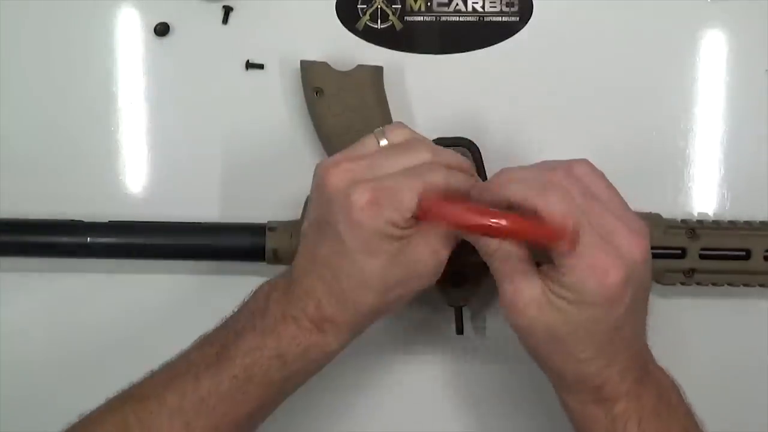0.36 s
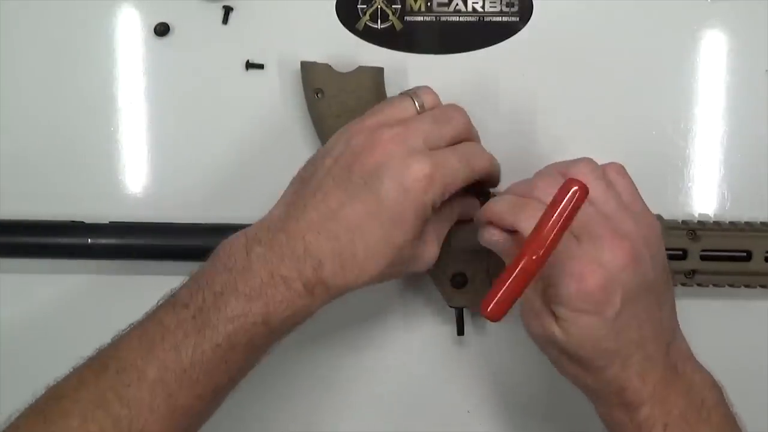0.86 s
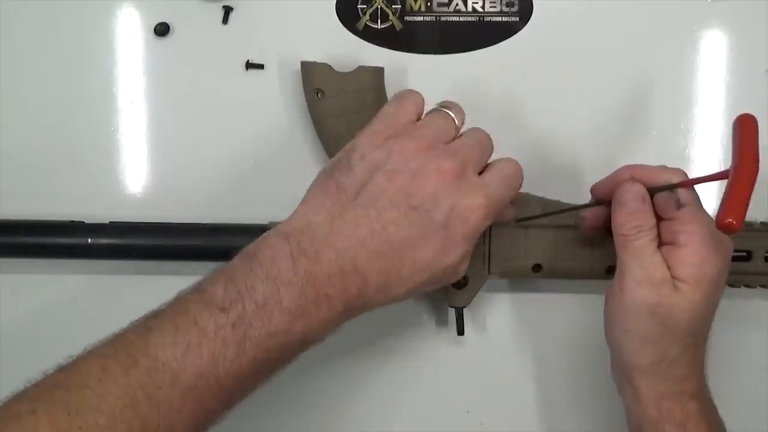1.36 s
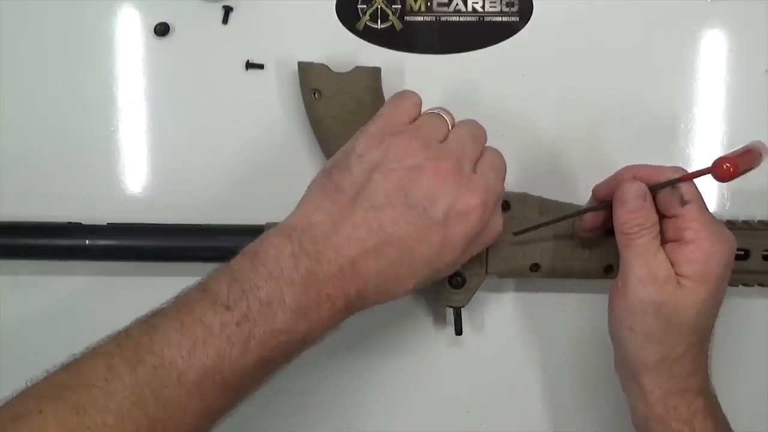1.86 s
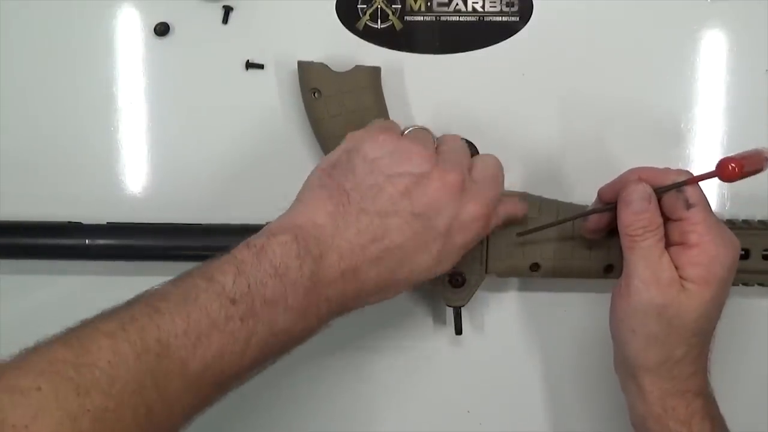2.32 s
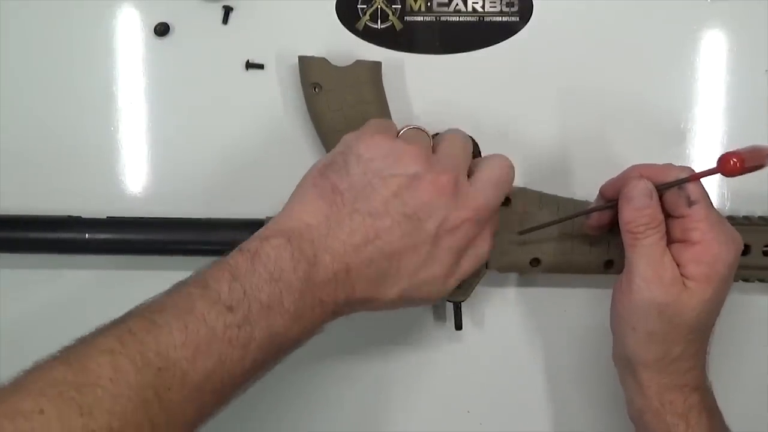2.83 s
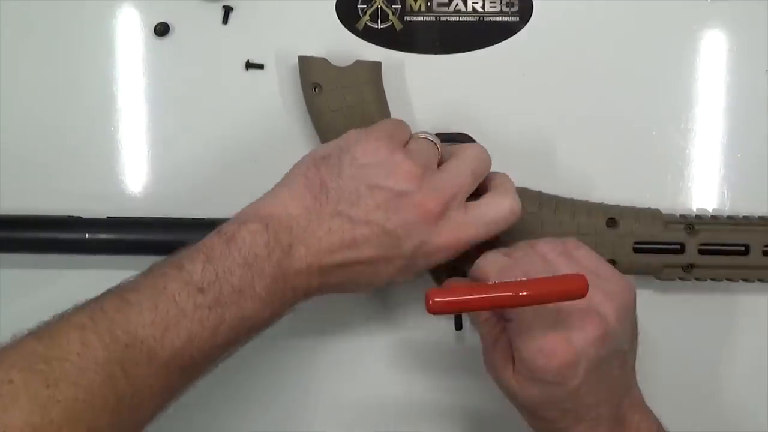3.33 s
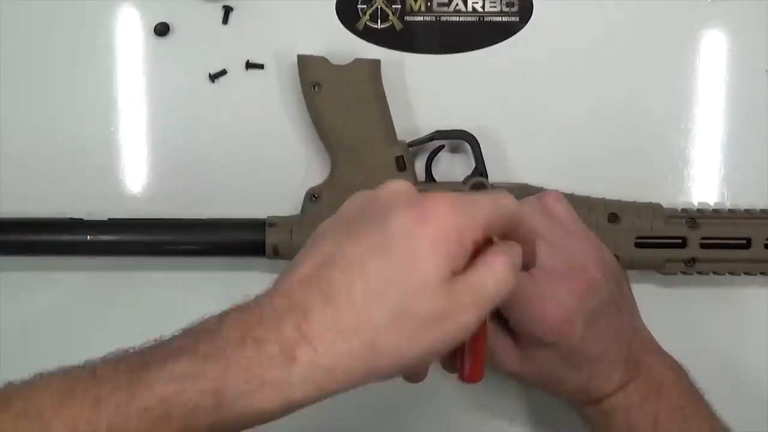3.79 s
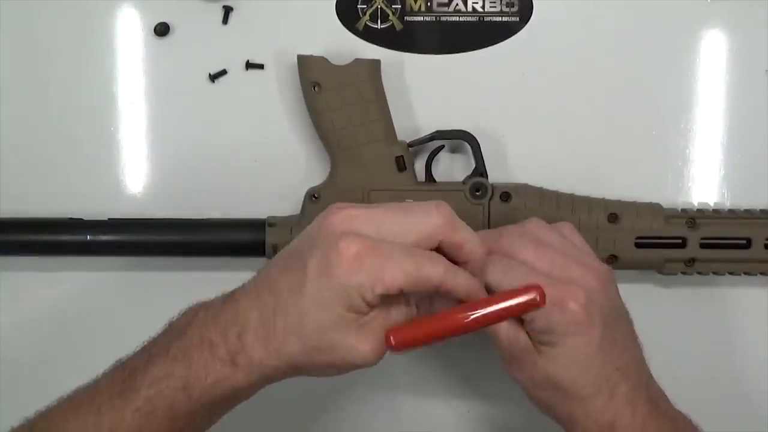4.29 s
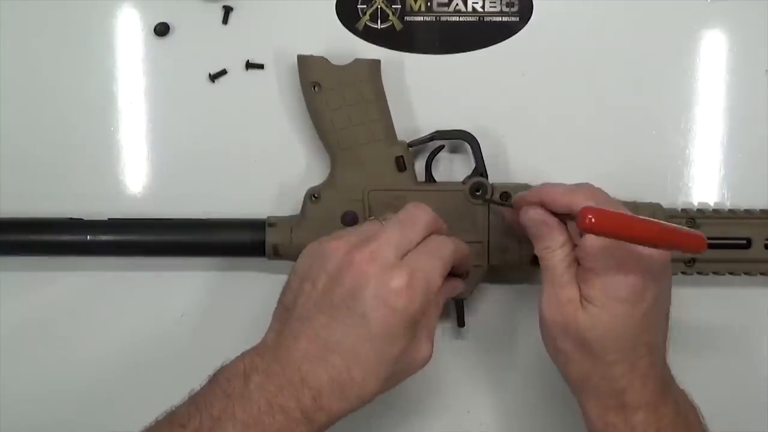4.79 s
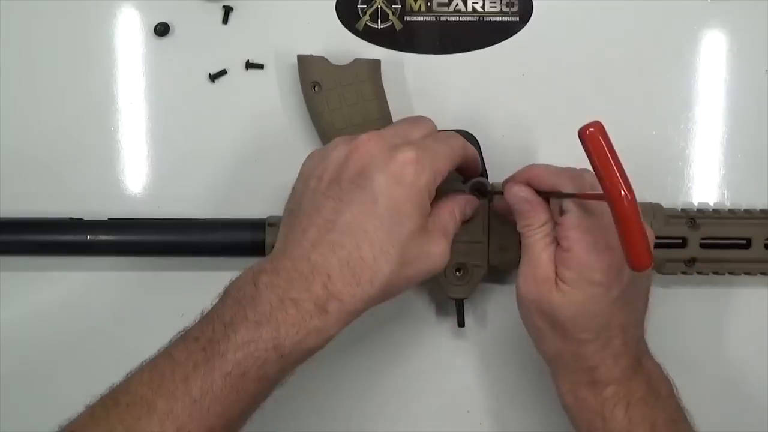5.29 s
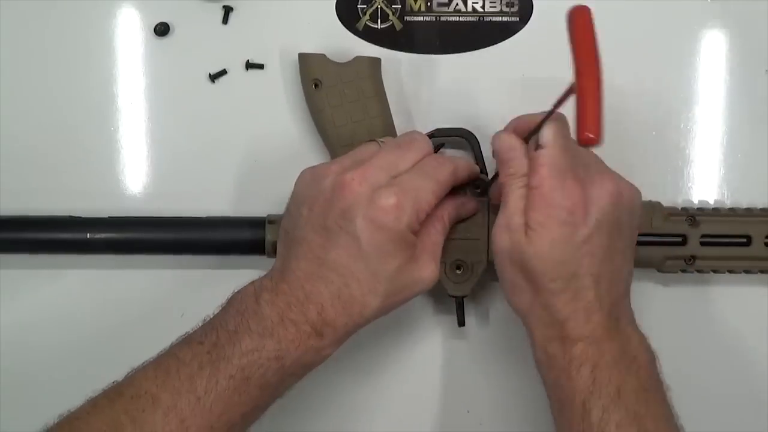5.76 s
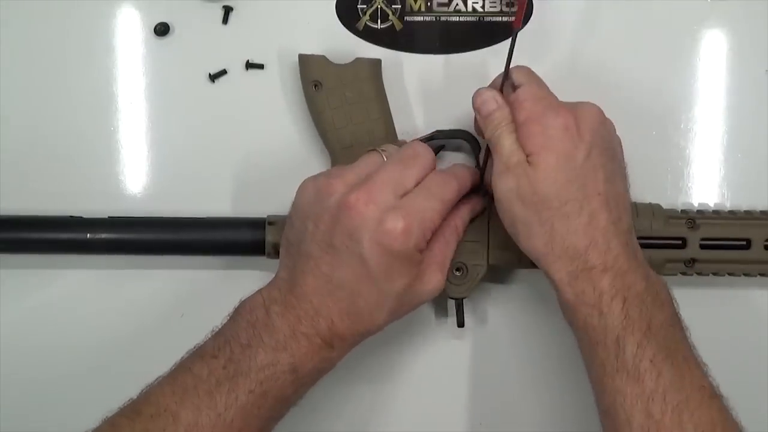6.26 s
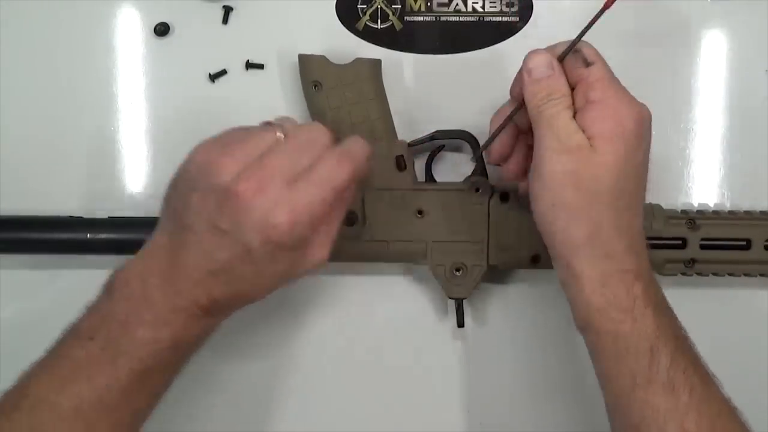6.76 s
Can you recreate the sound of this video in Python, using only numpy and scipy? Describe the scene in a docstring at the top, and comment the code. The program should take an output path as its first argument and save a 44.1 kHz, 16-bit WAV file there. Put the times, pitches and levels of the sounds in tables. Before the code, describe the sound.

Small hand work heard close in a workshop, nearly silent at first: bright metal ticks, dull frame taps and gritty rubs come in quick clusters over thin fan noise. A dropped screw patters once. After about six seconds a hard cut brings a much louder, slower, low humming fan with duller treble, then a screw scrapes, snaps and rattles loose.

```python
"""Workshop with a steady fan hum: hands turn small screws out of a plastic frame with a thin steel key.
The first part is faint and sounds about three times too fast: high hum, steel ticks, frame knocks, rubbing
and a bouncing screw. At a hard cut the room comes in loud, at its own speed and with a duller top, and a
screw scrapes, clicks and rattles loose. Fans are shaped noise and tones; contacts are noise and ringing modes."""
import sys
import numpy as np
from scipy import signal
from scipy.fft import rfft, irfft
from scipy.io import wavfile

SR = 44100
rng = np.random.default_rng(int(sys.argv[2]) if len(sys.argv) > 2 else 0)


def materialize(psi):
    """Save the field psi as 16-bit PCM at rate SR to the path in sys.argv[1].

    A 1-D psi becomes a single channel; in a 2-D psi each row is a channel.
    """
    bounded = np.clip(np.atleast_2d(psi).T, -1, 1)
    quanta = np.round(bounded * 32767).astype(np.int16)
    wavfile.write(sys.argv[1], SR, quanta)


def attenuation_scalar(level_db):
    """Turn a level in dB into a linear amplitude multiplier (20 dB per decade)."""
    decades = np.asarray(level_db, float) / 20
    return 10 ** decades


N = 303405
CUT_S = 6.2316

# modes of frame and table, fast part: (frequency [Hz], level [dB], t60 [s])
FRAME_MODES = [(350, -9.5, 0.084), (406, -1.5, 0.03), (452, 1.5, 0.027), (589, -1.5, 0.021),
               (785, 3.5, 0.018), (974, -4, 0.054), (1354, -4.5, 0.03), (1500, -6, 0.034),
               (1985, -12, 0.01), (2400, -13.5, 0.014), (2930, -10, 0.017)]


def rms_one(x):
    """Scale to unit rms."""
    return x / np.sqrt(np.mean(x ** 2) + 1e-20)


def at_hz(points, hz):
    """Read a spectrum on a log-frequency axis."""
    point_hz, point_db = np.transpose(points)
    return np.interp(np.log(hz), np.log(point_hz), point_db)


def band(x, low_hz, high_hz):
    """Butterworth band-pass."""
    sos = signal.butter(2, [low_hz, min(high_hz, 0.45 * SR)], "band", fs=SR, output="sos")
    return signal.sosfilt(sos, x)


def low_pass(x, top_hz):
    """A steep top edge."""
    return signal.sosfilt(signal.ellip(12, 0.5, 70, top_hz, fs=SR, output="sos"), x)


def ring(clicks, hz, t60_s):
    """Two-pole resonator: a unit click sets a decaying sine of height 1 ringing."""
    radius = attenuation_scalar(-60 / (t60_s * SR))
    angle = 2 * np.pi * min(hz, 0.45 * SR) / SR
    return signal.lfilter([0, np.sin(angle)], [1, -2 * radius * np.cos(angle), radius ** 2], clicks + 1e-18)


def air(spectrum, side, surge_db, surge_hz, size):
    """Fan noise shaped in frequency, its rumble surging; channels differ more in the treble. Mid rms 1."""
    hz = np.maximum(np.fft.rfftfreq(size, 1 / SR), 1)
    mid, apart, slow = rfft(rng.standard_normal((3, size)))
    mid = mid * attenuation_scalar(at_hz(spectrum, hz))
    apart = irfft(apart * attenuation_scalar(at_hz(spectrum, hz) + at_hz(side, hz)), size)
    surge = attenuation_scalar(surge_db * rms_one(irfft(slow / (1 + (hz / surge_hz) ** 2), size)))
    rumble = 1 / (1 + (hz / 600) ** 2)
    mid = irfft(mid * rumble, size) * rms_one(surge) + irfft(mid * (1 - rumble), size)
    return np.array([mid + apart, mid - apart]) / np.std(mid)


def hum(lines, size):
    """Motor tones: a steady sine plus a wavering share, noise through a narrow resonance."""
    t = np.arange(size) / SR
    out = np.zeros(size)
    for hz, db, width_hz, steady in lines:
        sine = np.sqrt(2) * np.sin(2 * np.pi * (hz * t + rng.random()))
        wavering = ring(rng.standard_normal(size + SR), hz, 3.5 / width_hz)
        wavering = rms_one(band(wavering, hz / 2, hz * 2)[SR:])  # skip the resonator's build-up
        out += attenuation_scalar(db) * (np.clip(steady, 0, 1) * sine + np.clip(1 - steady, 0, 1) * wavering)
    return out


def fast_fan(size):
    """Faint, high fan of the fast part: broadband air noise under motor tones."""
    # air noise shape: (frequency [Hz], relative density [dB])
    spectrum = [(18, -79), (30, -44), (90, -7.5), (141, -13), (232, -4.5), (346, -4), (430, -7.5),
                (661, -7), (1300, -12.5), (1750, -10.5), (3500, -19), (5500, -24), (8000, -25),
                (8600, -27.5), (9200, -25.5), (11000, -26.5), (16000, -34)]
    # channel difference: (frequency [Hz], side relative to mid [dB])
    side = [(60, -51), (110, -16), (190, -42), (340, -29), (610, -23), (1100, -16.5), (1960, -12.5),
            (3500, -6.5), (6250, -6), (11200, -7.5)]
    # motor tones: (frequency [Hz], level [dB], resonance width scale [Hz], steady share [0-1])
    tones = [(176, -84.5, 16, 0.18), (231.5, -76.5, 14.3, 0.21), (348.5, -81, 24, 0.02),
             (428, -80.5, 9.2, 0.42), (723, -76.5, 4.6, .65), (1073, -83.5, 5, 0.7), (1175, -86, 2.8, .75),
             (1222, -85.5, 4, 0.7), (1766, -83.5, 18, 0.15), (2380, -85, 10, .5), (8610, -90, 350, 0.1)]
    return attenuation_scalar(-70) * air(spectrum, side, surge_db=2.0, surge_hz=16.0, size=size) + hum(tones, size)


def loud_fan(size):
    """Loud fan at its own speed: broadband air noise under low motor tones."""
    # air noise shape: (frequency [Hz], relative density [dB])
    spectrum = [(15, -59), (25, -15), (66, -5.5), (178, -7.5), (250, -6.5), (380, -10.5), (460, -15.5),
                (580, -8.5), (700, -13.5), (830, -12), (980, -18.5), (1230, -21), (2580, -25), (5500, -30),
                (6200, -35), (6900, -34.5), (8300, -36), (11500, -37.5)]
    # channel difference: (frequency [Hz], side relative to mid [dB])
    side = [(60, -48), (110, -20), (190, -24), (340, -15), (610, -13.5), (1100, -8), (1960, -7),
            (3500, -7.5), (6250, -6), (11200, -11.5)]
    # motor tones: (frequency [Hz], level [dB], resonance width scale [Hz], steady share [0-1])
    tones = [(57.2, -50, 9.2, .1), (81.4, -44.5, 10, 0.52), (107, -46, 22, 0.03), (163.6, -51, 20, 0.37),
             (239.3, -45, 7.4, 0.67), (360, -59, 4, 0.83), (402, -58.5, 4.8, .6)]
    return attenuation_scalar(-39.5) * air(spectrum, side, surge_db=3.0, surge_hz=8.2, size=size) + hum(tones, size)


def room(x, t60_s, level_db, apart_db):
    """Scattered reflections, unlike in each channel; close treble ones differ, and the left side leads."""
    left_leads_us = 6.8  # the hands are a little nearer the left
    t = np.arange(int(0.25 * SR)) / SR
    tail = band(rng.standard_normal((2, len(t))), 480, 14000) * attenuation_scalar(-60 * t / t60_s) * (t > 0.0015)
    tail /= np.sqrt(np.sum(tail ** 2, axis=1, keepdims=True))
    close = band(rng.standard_normal(900) * attenuation_scalar(-60 * t[:900] / 0.02), 3500, 18000)
    close /= np.sqrt(np.sum(close ** 2))
    apart = attenuation_scalar(apart_db) * signal.oaconvolve(close, x)[:N]
    apart += left_leads_us * 1e-6 * SR / 2 * np.gradient(x)
    return x + apart * [[1], [-1]] + attenuation_scalar(level_db) * signal.oaconvolve(x[None], tail, axes=1)[:, :N]


def strokes():
    """Strength of grit and of drag as fingers and threads rub: each stroke swells, holds and fades."""
    # (start [s], length [s], fine grit [dB], drag on the frame [dB])
    rows = [(-.01, 0.028, -68, -62.5), (0.265, 0.28, -84.5, -89), (0.561, 0.16, -74.5, -75),
            (0.762, .16, -79.5, -80), (1.238, 0.74, -86, -100), (2.023, 0.21, -79.5, -88),
            (2.306, 0.032, -68.5, -69), (2.427, .43, -79.5, -74), (3.038, 0.34, -90, -103),
            (3.602, 0.062, -71.5, -86), (4.188, 0.067, -75.5, -87), (4.44, .2, -71, -67.5),
            (4.701, 0.23, -83, -92), (4.916, .035, -76.5, -93), (5.012, .07, -82.5, -76),
            (5.64, 0.052, -79, -78)]
    rise_s, fade_s = 0.026, 0.05  # linear swell; exponential fade
    t = np.arange(0, N / SR, 0.001)
    start, length, grit_db, drag_db = np.transpose(rows)[:, :, None]
    shape = np.clip((t - start) / rise_s, 0, 1) * np.exp(-np.maximum(t - start - length, 0) / fade_s)
    return [np.interp(np.arange(N) / SR, t, (attenuation_scalar(db) * shape).max(axis=0)) for db in (grit_db, drag_db)]


def grains(per_s, spread_db):
    """Random tiny slips of uneven size; rms 1."""
    sizes = attenuation_scalar(spread_db * np.minimum(rng.exponential(1, N), 5)) * rng.choice([-1, 1], N)
    return rms_one(sizes * (rng.random(N) < per_s / SR))


def rubbing(grit_gain, drag_gain):
    """Fine grit sings in the steel, coarser drag rings the frame; both clump and fade between strokes."""
    slow = signal.lfilter([1], [1, -1.98, 0.9801], rng.standard_normal(N))
    clumps = attenuation_scalar(2.5 * rms_one(slow))
    slips = grains(2500.0, spread_db=2.5) * clumps
    grit = rms_one(band(band(slips, 4600, 17000), 4600, 17000)) + 0.29 * rms_one(band(slips, 8100, 10000))
    slips = grains(800, spread_db=3.0) * clumps
    drag = band(sum(attenuation_scalar(db) * ring(slips, hz, t60_s) for hz, db, t60_s in FRAME_MODES), 330, 1900)
    return grit_gain * rms_one(grit) + drag_gain * rms_one(drag)


def strikes(at, db, modes, colour_db, spread_db, detune, rise_ms, rise_cycles):
    """Each blow strikes all modes; its place colours it, the grip shifts each pitch, strength and phase."""
    phase_spread_rad = 0.45
    t, out = np.arange(3000) / SR, np.zeros(N + 3000)
    chance = rng.standard_normal((len(at), 3, len(modes)))
    rings = np.zeros((len(at), len(t)))
    for k, (hz, mode_db, t60_s) in enumerate(modes):
        loud, pitch, phase = chance[:, :, k, None].transpose(1, 0, 2)
        level_db = np.reshape(db + mode_db + colour_db(hz), (-1, 1)) + spread_db * loud
        rise_s = max(rise_ms / 1000 + rise_cycles / hz, 2e-5)
        gain = attenuation_scalar(level_db - 60 * t / t60_s) * (1 - np.exp(-t / rise_s))
        rings += gain * np.sin(2 * np.pi * hz * np.exp(detune * pitch) * t + phase_spread_rad * phase)
    for i, one in zip(at, rings):
        out[i:i + len(t)] += one
    return out[:N]


def knocks():
    """Soft contacts ring the frame, low modes swelling later, under a dull thud; too small for deep bass."""
    # frame on table: (time [s], low modes [dB], middle modes [dB], high modes [dB])
    rows = [(0.013, -49.5, -74, -54), (.217, -59, -66, -63), (0.287, -56, -75, -60), (0.701, -63, -76, -72),
            (0.905, -52.5, -53, -48), (1.214, -55, -74, -70), (2.05, -56, -69, -60), (2.311, -53, -65, -60),
            (2.495, -50.5, -66, -55), (2.5697, -43.5, -45, -43.5), (2.633, -41, -44.5, -41.5),
            (2.773, -44.5, -49, -43), (2.8068, -44.5, -50, -46), (2.989, -54.5, -71, -55),
            (3.147, -52, -57, -56.5), (3.421, -51.5, -49, -45.5), (3.495, -74, -58, -51),
            (4.241, -65, -58, -51), (4.444, -66, -64, -58), (4.46, -50, -65, -53), (4.465, -69, -64, -51),
            (4.473, -67, -61, -55), (4.487, -59, -60, -62), (4.497, -65, -66, -54), (4.51, -67, -65, -53),
            (4.53, -51, -56, -58), (4.537, -70, -58, -56), (4.563, -64, -68, -57), (4.585, -64, -65, -56),
            (4.621, -68, -60, -55), (4.628, -75, -57, -65), (5.4427, -54.5, -51, -50.5),
            (5.61, -55.5, -67, -72), (5.67, -53.5, -64, -61), (5.675, -68, -63, -48),
            (5.683, -50, -64, -64), (5.803, -55.5, -59, -48), (5.949, -54, -68, -53.5),
            (5.964, -58, -70, -74), (6.009, -63, -63, -68), (6.05, -48.5, -54, -48.5),
            (6.135, -61, -57, -42.5), (6.199, -54.5, -74, -62)]
    s, low_db, middle_db, high_db = np.transpose(rows)
    at = np.round(s * SR).astype(int)

    def group_db(hz):
        return low_db if hz < 680 else middle_db if hz < 1150 else high_db

    out = strikes(at, 0, FRAME_MODES, group_db, spread_db=0.0, detune=0.033, rise_ms=0.79, rise_cycles=0.48)
    thuds = rng.standard_normal((len(at), 400)) * np.exp(-np.arange(400) / SR / 0.0024)
    thuds *= attenuation_scalar(high_db - 1.0)[:, None]
    for i, thud in zip(at, band(band(thuds, 400, 2400), 400, 2400)):
        out[i:i + 400] += thud
    return band(out, 186, 6300)


def dropped_screw():
    """A screw set down touches twice, then bounces: dry bright cracks, each leaving a buzz of the table top."""
    # (time [s], level [dB])
    bounces = [(3.603, -48), (3.6053, -40.5), (3.6246, -46), (3.6393, -43), (3.648, -43.5), (3.6532, -52),
               (3.6568, -53)]
    crack_ms, buzz_db, buzz_ms = 0.55, -20, 10.0  # decay constants; buzz relative to crack
    out, age_ms = np.zeros(N), np.arange(2000) * 1000 / SR
    shape = np.exp(-age_ms / crack_ms) + attenuation_scalar(buzz_db) * np.exp(-age_ms / buzz_ms)
    for (s, level_db), noise in zip(bounces, rng.standard_normal((len(bounces), 2000))):
        out[round(s * SR):][:2000] += attenuation_scalar(level_db) * noise * shape
    return band(out, 4400, 17000) + 1.7 * band(out, 10800, 14000) + 0.6 * band(out, 8700, 10600)


def steel(events, modes, slip_ms, crack_db, octaves, octaves_down, narrow_db, narrow_down_db,
          own_db, own_t60_s, spread_db):
    """A tick: a slip of noise, a short ring at its brightest pitch, and the steel modes near that pitch."""
    s, db, bright_hz = np.transpose(events)
    length_ms = slip_ms * np.exp(0.1 * rng.standard_normal(len(s)))
    at = np.round(s * SR).astype(int)

    def colour_db(hz):  # modes weaken by narrow_db one octave off the brightest pitch
        return -np.where(hz < bright_hz, narrow_down_db, narrow_db) * np.log2(hz / bright_hz) ** 2

    out = strikes(at + 15, db, modes, colour_db, spread_db, detune=0.022, rise_ms=0.09, rise_cycles=0)
    t = np.arange(800) / SR
    noise = rng.standard_normal((len(at), 800))
    for i, level_db, hz, ms, white in zip(at, db, bright_hz, length_ms, noise):
        age = 1000 * t / max(ms, 0.2)  # in slip lengths
        low_hz, high_hz = hz * 2 ** -octaves_down, hz * 2 ** octaves
        slip = rms_one(band(band(white, low_hz, high_hz), low_hz, high_hz))
        slip *= attenuation_scalar(crack_db) * np.sqrt(age) * np.exp(-age)
        own = attenuation_scalar(own_db) * np.sin(2 * np.pi * hz * t) * attenuation_scalar(-60 * t / own_t60_s) * (1 - np.exp(-3 * age))
        out[i:i + 800] += (attenuation_scalar(level_db) * (own + slip))[:N - i]
    return out


def faint_ticks(grit):
    """Ticks (time, level, brightest Hz) dealt by chance while fingers rub, more when they rub harder."""
    count, level_db, spread_db = 18, -62, 3.0
    bright_hz, spread_octaves = 8700, 0.2
    when, loud, pitch = rng.random(count), *rng.standard_normal((2, count))
    share = np.cumsum(grit ** 0.7)
    s = np.interp(when, share / share[-1], np.arange(N) / SR)
    hz = np.minimum(bright_hz * 2 ** (spread_octaves * pitch), 0.3 * SR)
    return np.transpose([s, level_db + spread_db * loud, hz])


def fast_ticks(grit):
    """Steel ticks of key and screws in the fast part, with faint chance ticks among them."""
    # (time [s], level [dB], brightest pitch [Hz])
    ticks = [(0.0298, -52.5, 10600), (0.26, -59, 8150), (0.287, -61, 8460), (0.3187, -56.5, 3240),
             (0.35, -62, 5800), (0.3643, -58.5, 6230), (0.5821, -57, 9500), (0.6225, -49.5, 5760),
             (0.694, -55, 5650), (0.732, -62, 5600), (0.83, -60, 8600), (0.8643, -56, 4200),
             (0.9038, -58, 4480), (0.914, -57, 4300), (1.0424, -54, 13000), (1.0557, -48.5, 4200),
             (1.102, -57, 5340), (1.2124, -46, 4000), (1.2135, -53, 9600), (1.223, -51, 9600),
             (1.2421, -53.5, 8800), (1.293, -50.5, 4290), (1.4225, -59, 8350), (1.56, -56.5, 8650),
             (1.575, -56, 8700), (1.53, -63, 8650), (1.667, -66, 8700), (1.7385, -56, 4400),
             (1.7394, -54.5, 8500), (1.7988, -50.5, 9200), (1.824, -60, 7200), (2.0472, -53, 9500),
             (2.05, -52, 4400), (2.1272, -54, 9000), (2.129, -57.5, 3450), (2.18, -45, 9400),
             (2.1811, -46.5, 4300), (2.2913, -52, 8900), (2.3166, -37, 8800), (2.384, -57, 8400),
             (2.397, -58, 10000), (2.468, -63, 4130), (2.57, -40, 4200), (2.591, -46, 8740),
             (2.633, -46.5, 7950), (2.7267, -48.5, 6760), (2.761, -55, 8100), (2.7733, -41, 4170),
             (2.807, -51, 8060), (2.82, -52, 10000), (3.0852, -55.5, 8900), (3.151, -59, 9000),
             (3.221, -61, 7900), (3.273, -57.5, 8800), (3.3288, -59, 8040), (3.3705, -57, 10900),
             (3.421, -45.5, 8600), (3.431, -58, 8800), (3.4535, -60, 10000), (3.463, -58.5, 7500),
             (4.174, -57.5, 10000), (4.239, -47.5, 10000), (4.2425, -59, 9050), (4.433, -50.5, 10100),
             (4.444, -49, 9150), (4.4568, -39.5, 10200), (4.472, -52, 10400), (4.4934, -48, 9800),
             (4.4995, -46.5, 9600), (4.5281, -46, 12200), (4.553, -52, 12000), (4.585, -51, 12700),
             (4.6299, -46.5, 13000), (4.6808, -51, 8900), (4.7465, -49.5, 9050), (4.818, -53, 8950),
             (4.9176, -44.5, 6980), (4.925, -50.5, 8650), (4.939, -53, 9800), (5.009, -48, 8800),
             (5.016, -48, 9350), (5.0425, -45.5, 9200), (5.051, -47, 10700), (5.0664, -52, 11300),
             (5.086, -56, 10000), (5.2874, -48, 6760), (5.289, -51, 4160), (5.3363, -56, 10600),
             (5.345, -57, 9050), (5.384, -59, 9500), (5.3904, -54, 8050), (5.441, -54, 4070),
             (5.6705, -45, 4460), (5.673, -53, 3000), (5.676, -44, 9000), (5.8029, -49, 4500),
             (5.8217, -46, 12400), (5.862, -56, 9300), (5.9482, -39, 6760), (5.96, -55, 10500),
             (6.0506, -49.5, 4250), (6.135, -52, 4250), (6.1805, -55, 10600)]
    # steel modes: (frequency [Hz], level [dB], t60 [s])
    modes = [(3380, -18.5, 0.013), (4290, -7.5, 0.013), (6460, -7.5, 0.0052), (6760, -15.5, 0.024),
             (8700, -7, 0.0047), (9600, -7, 0.0055), (10400, -2, 0.0019), (12200, -29, 0.0054),
             (14100, -12, 0.0041)]
    return steel([*ticks, *faint_ticks(grit)], modes, slip_ms=1.83, crack_db=-9.0, octaves=1.0,
                 octaves_down=0.54, narrow_db=7.0, narrow_down_db=12.0, own_db=-3.0, own_t60_s=0.0084,
                 spread_db=3.5)


def rattle():
    """Dense dry contacts of the loose screw, starting at once and tiring."""
    start_s, level_db, fade_db_per_s = 6.864, -19.5, 303
    age_s = np.arange(N) / SR - start_s
    gain = attenuation_scalar(level_db - fade_db_per_s * np.abs(age_s)) * (age_s > 0)
    return band(grains(9000.0, spread_db=-2.0) * gain, 1600, 20000)


def loud_clicks():
    """Scrape and clicks of the screw after the cut: short slips and steel modes at their own speed."""
    # (time [s], level [dB], brightest pitch [Hz])
    clicks = [(6.466, -28.5, 2280), (6.615, -31.5, 2430), (6.6998, -36.5, 10400), (6.708, -40, 10000),
              (6.7175, -36, 10600), (6.724, -24.5, 10400), (6.7285, -26, 7550), (6.729, -27, 4730),
              (6.7302, -26, 1990), (6.7306, -27, 1310), (6.7335, -33, 1700), (6.7375, -33, 1590),
              (6.8185, -35.5, 6900), (6.8442, -28, 6040), (6.8461, -17.5, 2280), (6.85, -29, 2270),
              (6.8575, -35, 9000), (6.859, -12, 5860), (6.8592, -31, 2800), (6.8642, -16.5, 8800),
              (6.8668, -14, 8900), (6.8648, -22.5, 1740), (6.867, -18.5, 1500), (6.8698, -14, 7500),
              (6.8748, -15, 5800)]
    # steel modes: (frequency [Hz], level [dB], t60 [s])
    modes = [(1410, -7.5, 0.024), (2320, -12, 0.017), (3640, -11, 0.017), (5130, -4, 0.011),
             (5860, -19, 0.0043), (7700, -10, 0.008), (10000, -6, 0.0097), (10600, -4.5, 0.0075)]
    return steel(clicks, modes, slip_ms=0.5, crack_db=-5.5, octaves=0.58, octaves_down=0.35,
                 narrow_db=18.0, narrow_down_db=18.0, own_db=-2.0, own_t60_s=0.0071, spread_db=4.5)


def scene():
    """The fast faint stretch, then a hard cut to the loud one."""
    cut, lead = round(CUT_S * SR), 2000  # lead: samples for the filter to settle before the cut
    grit, drag = strokes()
    hands = fast_ticks(grit) + knocks() + dropped_screw() + rubbing(grit, drag)
    fast = room(hands, t60_s=0.19, level_db=-16.5, apart_db=-17.0) + fast_fan(N)
    hands = loud_clicks() + rattle()
    loud = room(hands, t60_s=0.069, level_db=-12.0, apart_db=-13.0)[:, cut - lead:]
    loud = loud + loud_fan(loud.shape[1])
    return np.concatenate([low_pass(fast, 15800)[:, :cut], low_pass(loud, 11000)[:, lead:]], axis=1)


def roll_off(x):
    """The treble ends steeply here."""
    return signal.sosfilt(signal.butter(12, 16000, fs=SR, output="sos"), x)


def record(dry):
    """Output stage for the finished mix."""
    return roll_off(dry)


dry = scene()
out = record(dry)
materialize(out)
```